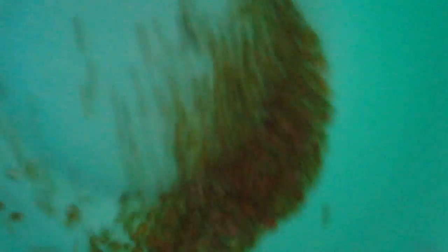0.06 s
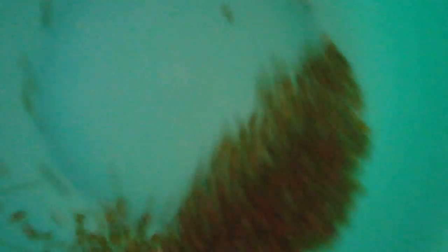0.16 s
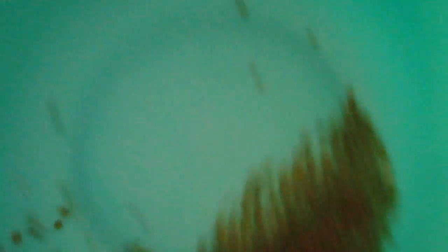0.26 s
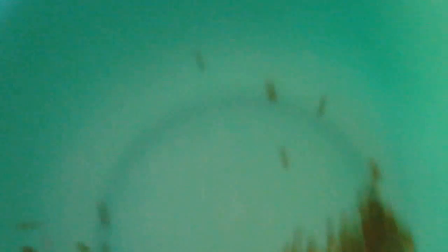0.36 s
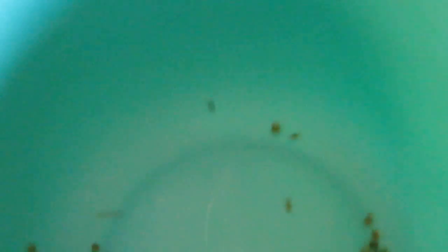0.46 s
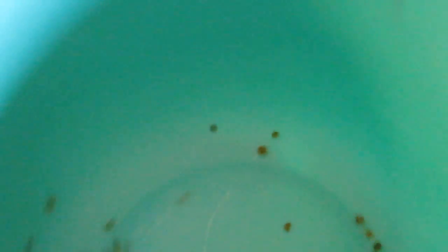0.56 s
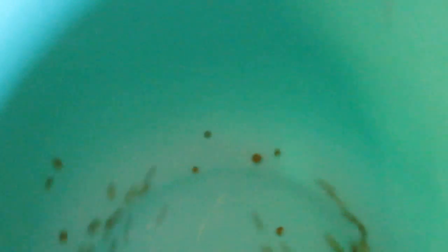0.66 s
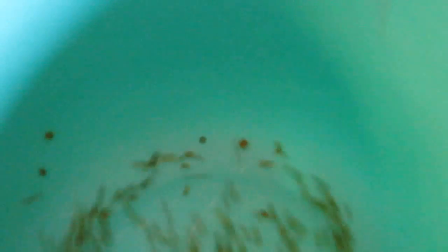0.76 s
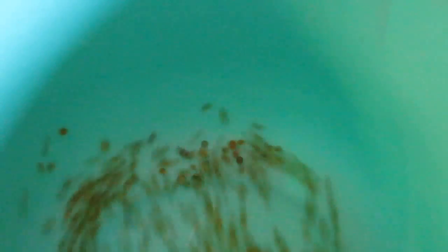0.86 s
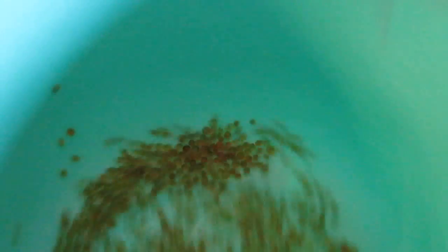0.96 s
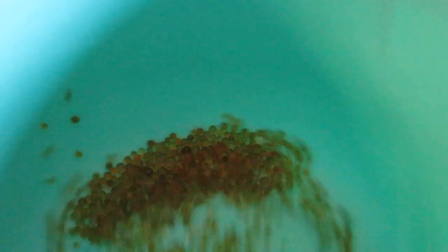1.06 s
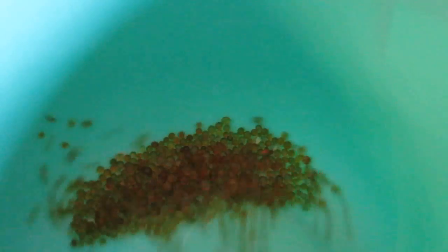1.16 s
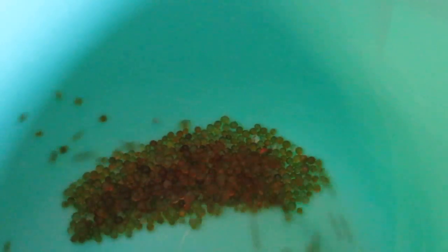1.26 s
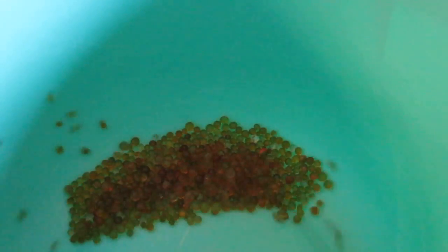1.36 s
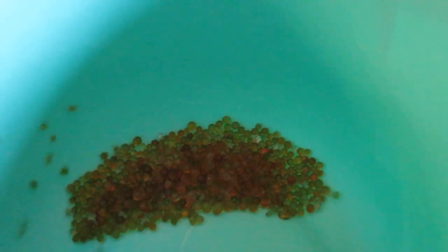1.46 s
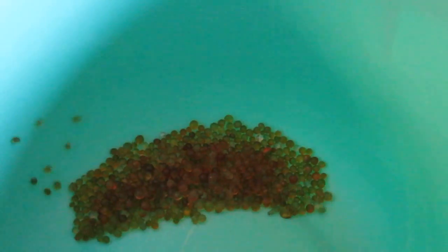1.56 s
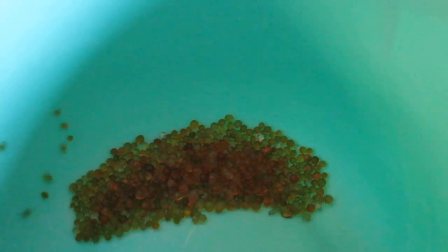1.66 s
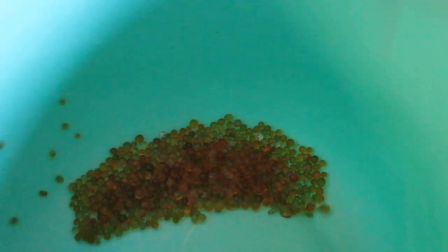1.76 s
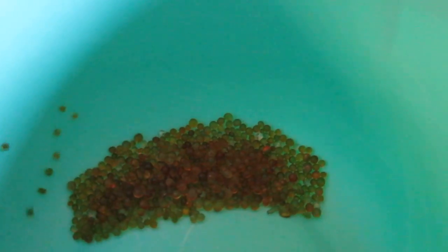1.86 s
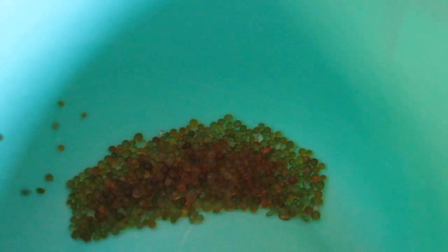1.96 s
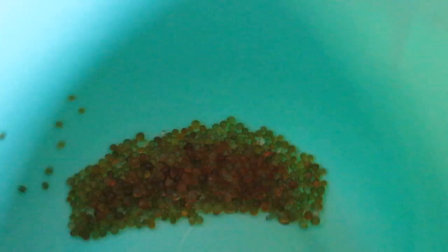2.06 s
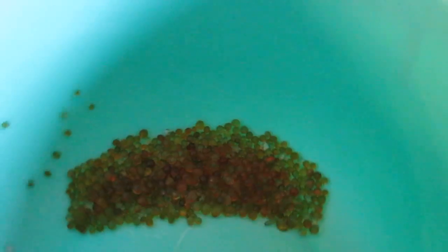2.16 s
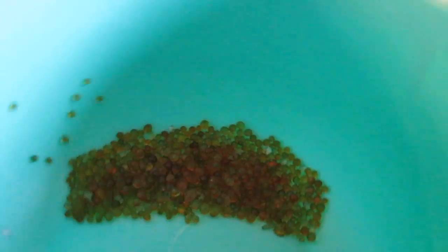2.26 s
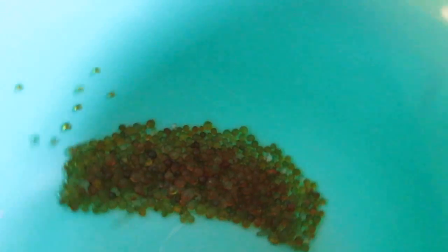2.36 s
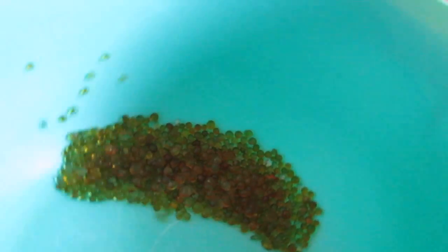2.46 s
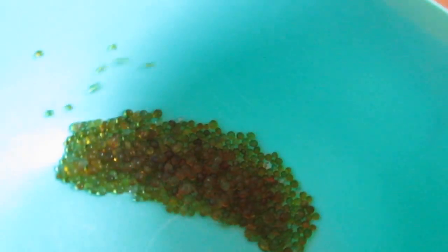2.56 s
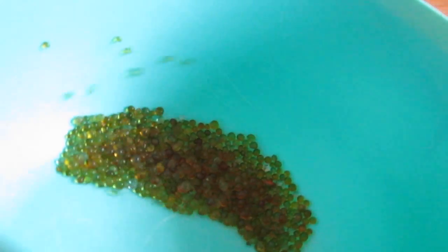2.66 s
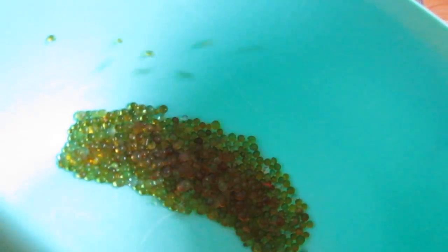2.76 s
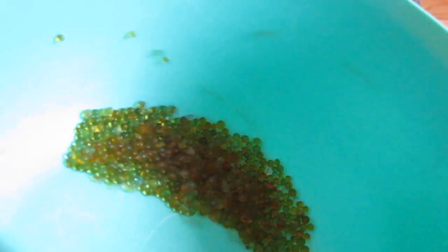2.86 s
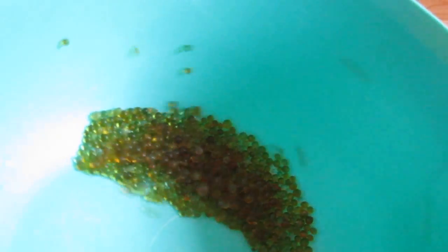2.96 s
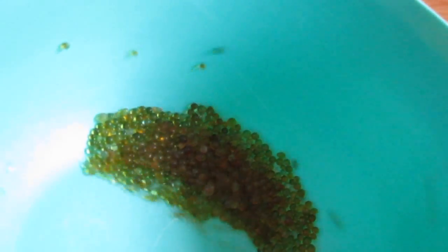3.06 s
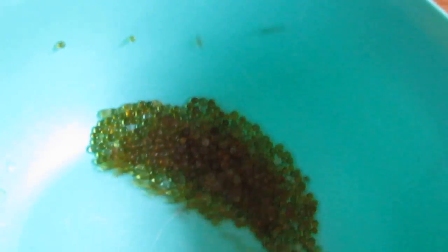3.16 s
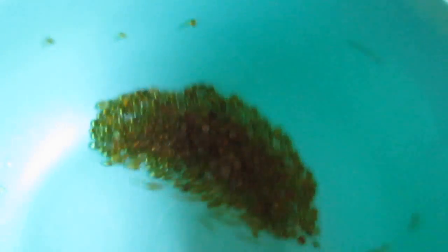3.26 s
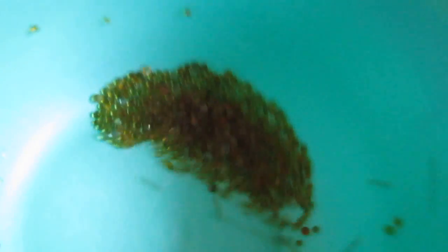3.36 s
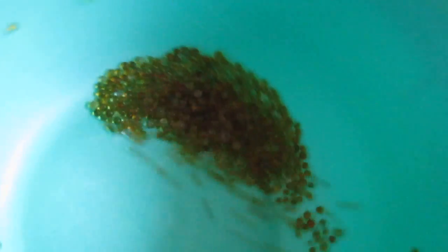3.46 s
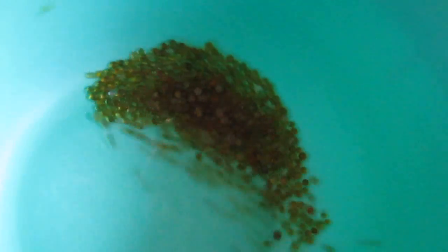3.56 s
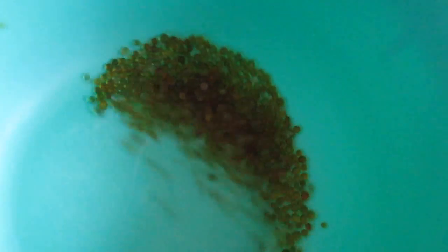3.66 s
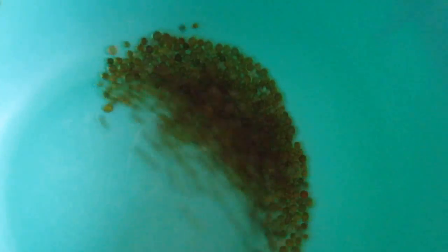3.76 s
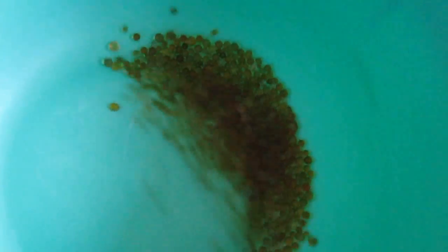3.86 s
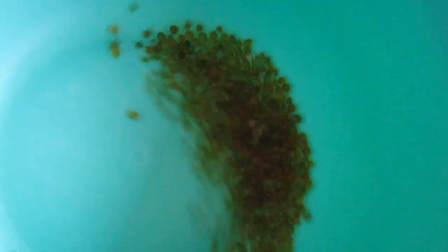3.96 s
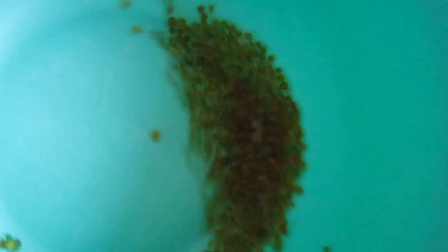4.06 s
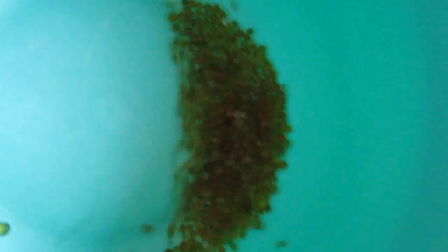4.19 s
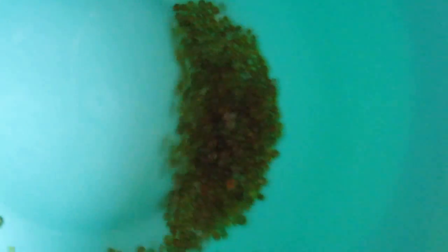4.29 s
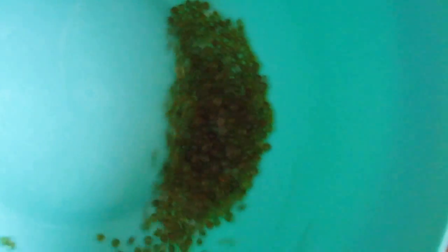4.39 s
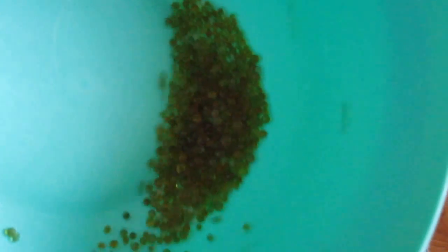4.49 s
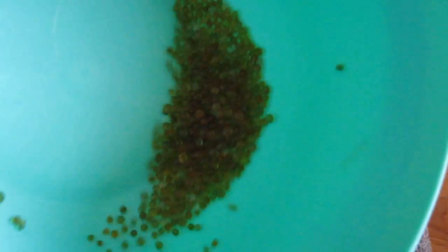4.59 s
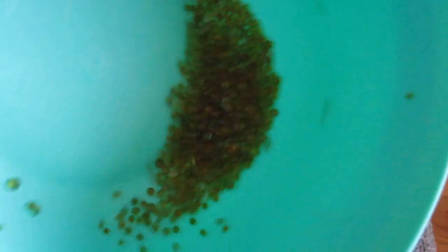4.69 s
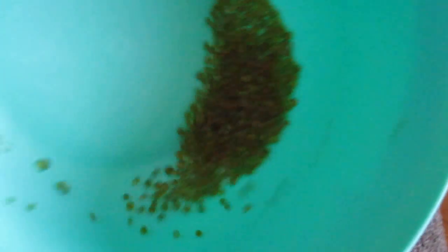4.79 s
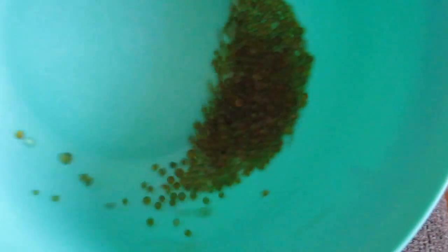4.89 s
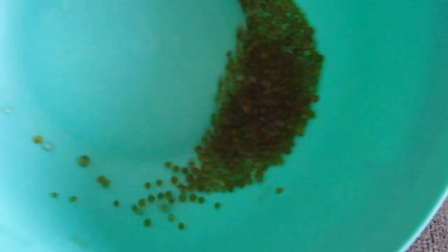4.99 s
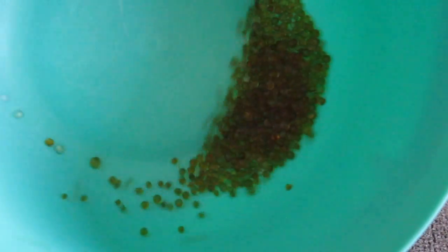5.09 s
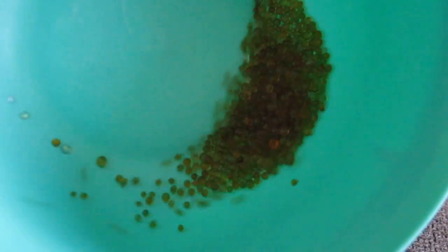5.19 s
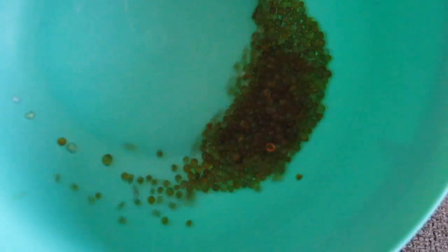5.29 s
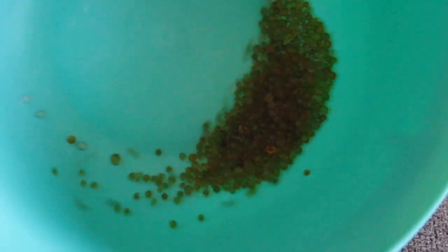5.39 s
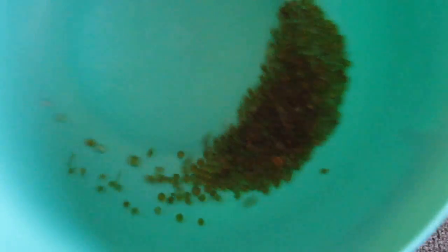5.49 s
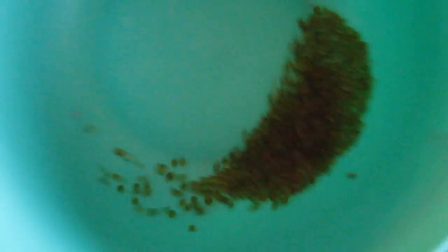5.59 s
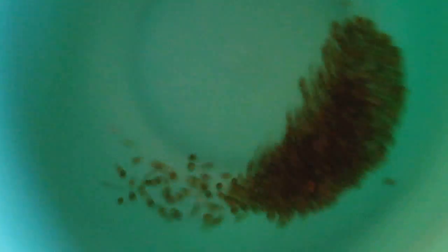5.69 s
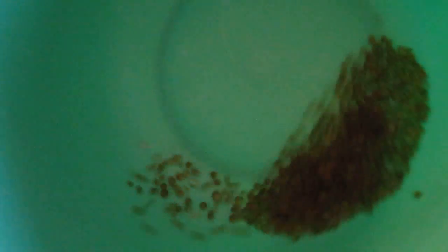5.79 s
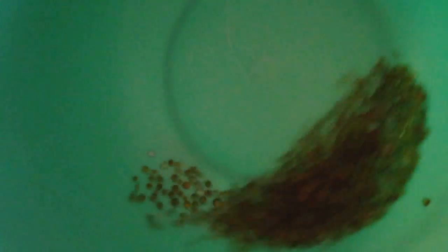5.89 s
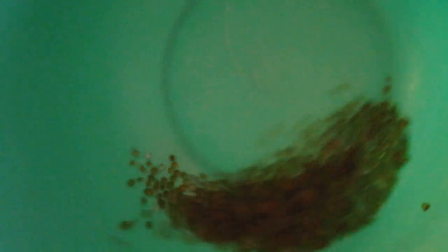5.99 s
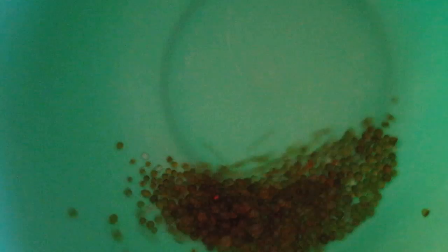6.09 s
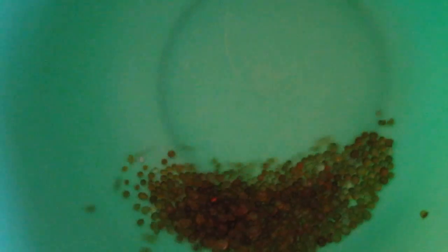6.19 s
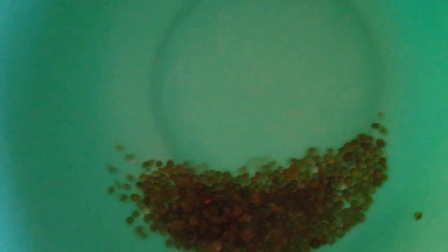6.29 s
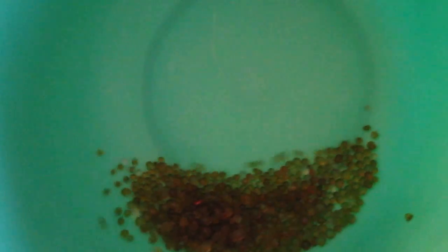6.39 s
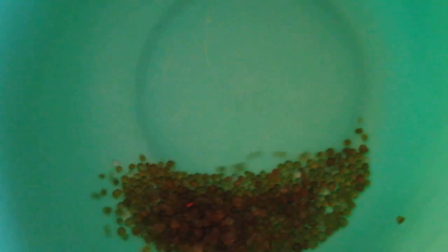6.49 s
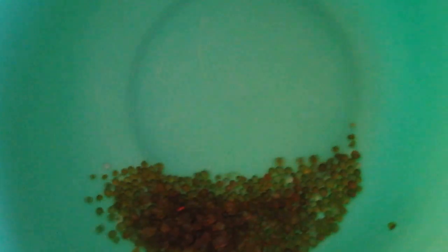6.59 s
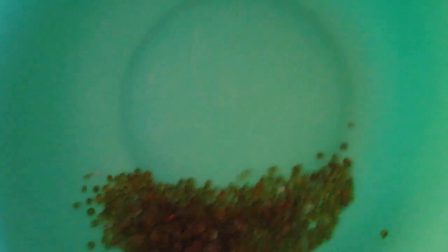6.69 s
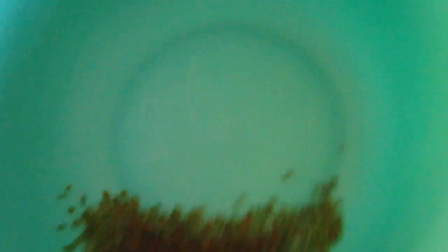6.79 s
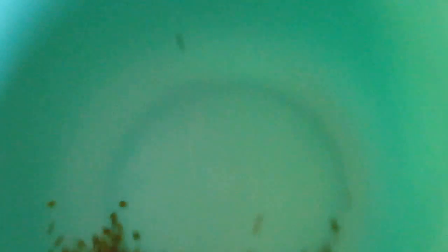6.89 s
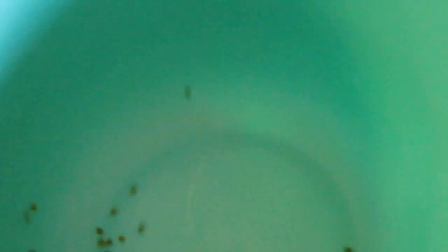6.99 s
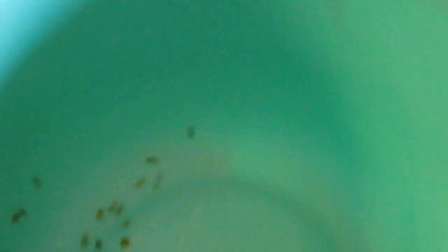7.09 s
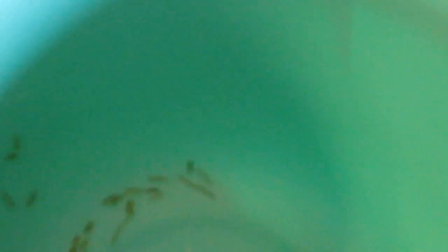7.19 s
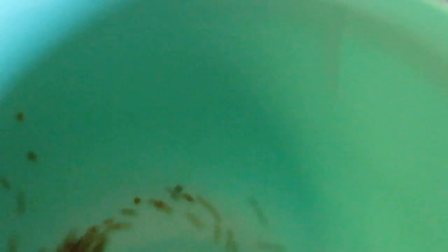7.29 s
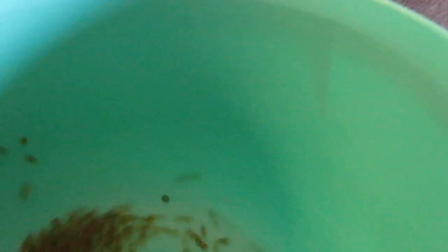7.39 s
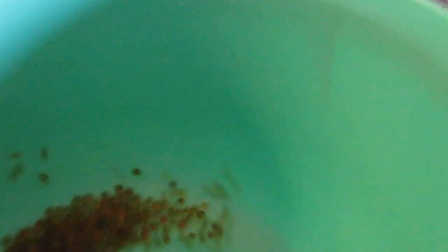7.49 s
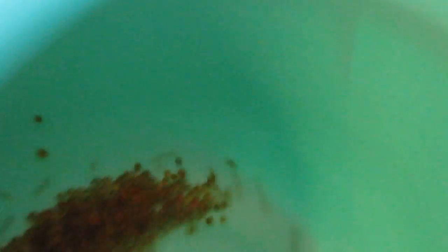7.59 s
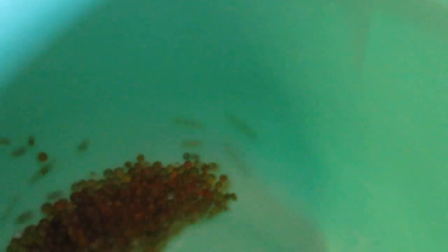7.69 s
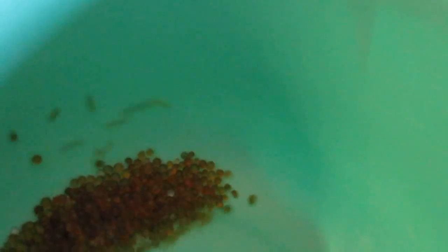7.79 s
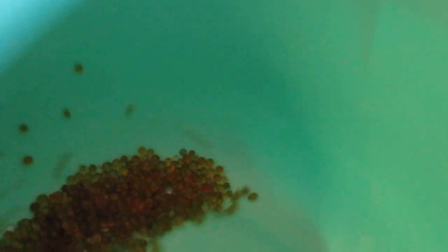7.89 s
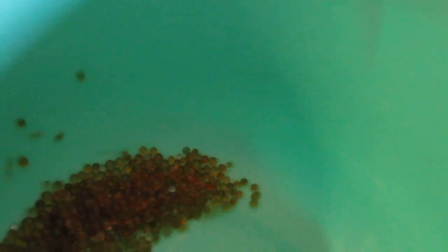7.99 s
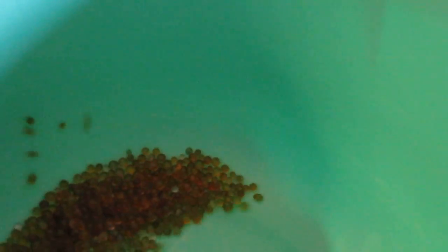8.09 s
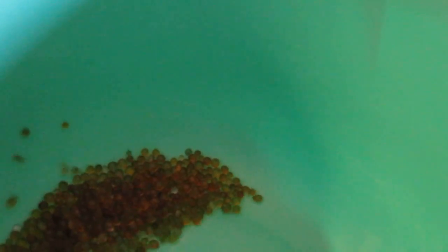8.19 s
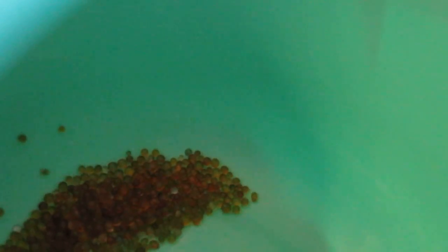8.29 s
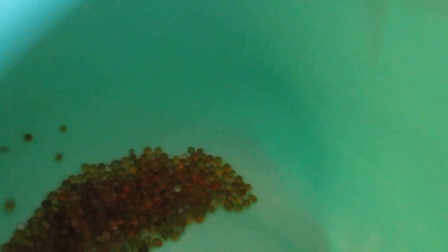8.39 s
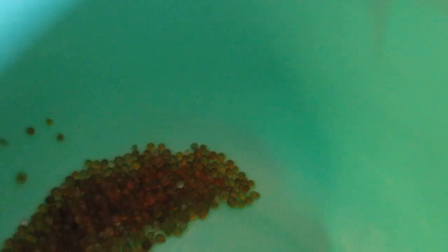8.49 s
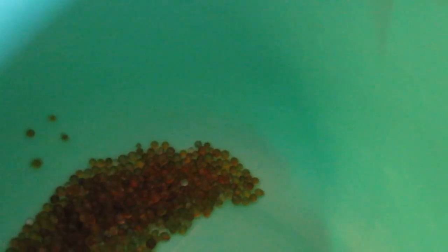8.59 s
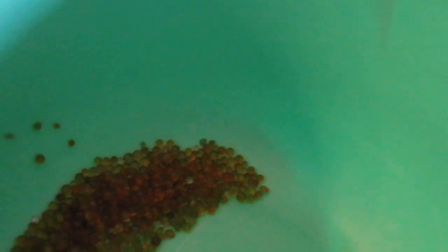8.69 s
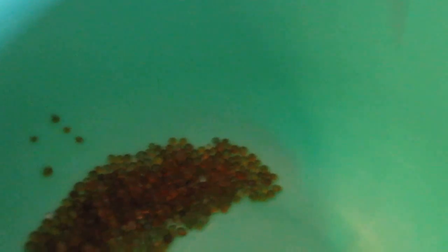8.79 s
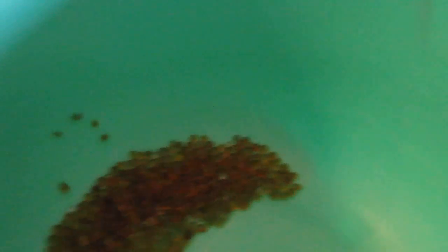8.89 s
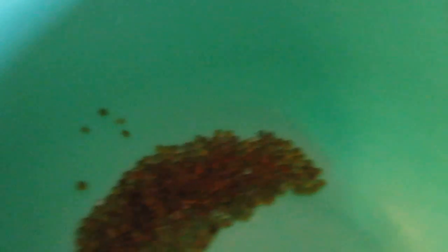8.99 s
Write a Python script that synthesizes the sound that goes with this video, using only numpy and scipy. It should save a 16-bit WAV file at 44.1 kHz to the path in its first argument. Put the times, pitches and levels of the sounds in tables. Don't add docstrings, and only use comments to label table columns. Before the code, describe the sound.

Many small hard beads pour and rattle around a plastic bowl in uneven swirls, thinning to lone ticks in short quiet pauses.

```python
import sys
import numpy as np
from scipy import signal
from scipy.fft import rfft, irfft
from scipy.io import wavfile

SR = 44100
rng = np.random.default_rng(int(sys.argv[2]) if len(sys.argv) > 2 else 0)


def int16_out(signal):
    q = np.round(np.clip(np.atleast_2d(signal).T, -1, 1) * 32767)
    wavfile.write(sys.argv[1], SR, q.astype(np.int16))


def ratio_of_db(decibels):
    return 10 ** (np.asarray(decibels, float) / 20)


N = 399105

# pitch_hz, width_hz, then level_db with the heap at the
# near wall [dB], lower side [dB], upper side [dB], far wall [dB]
WALL_MODES = [(318.5, 29.4, -16.5, -7, -19, -8.5), (421, 110, -15, -7, -20.5, -15.5),
              (651, 166, -7.5, -9.5, -12.5, -9), (1160, 107, -18.5, -9, -15.5, -4),
              (1347, 200, -19.5, -27, -12, -9.5), (1448, 217, -5, -12, -9.5, -16.5),
              (1936, 240, -12.5, -10.5, -12, -11), (2229, 132, -10.5, -11, -12.5, -11.5),
              (2523, 430, -13, -20, -12, -8.5), (2973, 110, -10.5, -11.5, -13.5, -23.5),
              (3226, 380, -10, -5.5, -11, -11), (3550, 220, -11.5, -10.5, -15, -8),
              (3830, 470, -13, -11.5, -10, -8.5), (4750, 460, -12.5, -15, -10.5, -11.5),
              (5010, 560, -6.5, -10.5, -17, -19), (5620, 310, -9.5, -6.5, -23, -15),
              (5976, 450, -8.5, -8.5, -11.5, -5), (6500, 610, -10, -28, -14, -14),
              (7560, 500, -17, -18.5, -10.5, -27), (8600, 350, -16, -13.5, -17, -12.5)]
SLOW_DB = -28.5
ECHO_S = 0.013
RING_VARIETY_DB = 3.0


def heap():
    # pitch_hz, level_db
    tick_colour = [(400, -7), (800, -22), (1700, -14), (3000, -10.5), (5000, -7.5), (7000, -11.5),
                   (9000, -3.5), (12000, -3.5), (16000, -48)]
    busy_per_s, thinning = 3500, 0.75
    echo_db = -8
    vigour, tumble, place = motion()
    creep = np.maximum(SLOW_DB - vigour, 0)
    rest = np.clip(-24 - vigour, 0, 14)

    def by_place(row):
        return np.interp(place, np.arange(4), row)

    levels = [vigour,
              vigour + by_place((-9.5, -15.5, -10, -14.5)) - 0.055 * creep + 0.8 * tumble,
              vigour + by_place((1, -4, -4.5, -11)) - 0.44 * creep + 0.3 * tumble,
              vigour + by_place((-4, -5.5, -7, -8.5)) - creep + tumble]

    per_s = np.clip(busy_per_s * ratio_of_db(thinning * (vigour + 25)), 200, 10000)
    clump_db = np.clip(-0.22 * (vigour + 14.5), 0.8, 4.0)
    train = knocks(per_s, spread_db=3.0, clump_db=clump_db)
    fade = ratio_of_db(-120 / (ECHO_S * SR))
    scatter = ratio_of_db(echo_db) * np.sqrt(signal.lfilter([1 - fade], [1, -fade], train ** 2))
    chance = rng.standard_normal(N + 5000)

    breathing_hz = by_place((543, 530, 522, 543)) - by_place((6.5, 1.24, 7.2, 2.5)) * rest
    breathing_db = levels[1] + by_place((0, 1, -7, -0.5)) + 0.4 * rest
    out = gliding(chance[:N][::-1] * ratio_of_db(breathing_db), breathing_hz, 39)

    for k, (hz, width_hz, *place_db) in enumerate(WALL_MODES):
        own = chance[k * 200:][:N]
        drive = train * (0.66 + 0.58 * own) + (0.41 + scatter) * own[::-1]
        ring = steep(drive * ratio_of_db(level_at(hz, levels) + by_place(place_db)), hz, width_hz)
        out += (-1) ** k * ring

    for k, hz in enumerate(np.geomspace(400, 16500, 16)):
        own = chance[k * 230 + 100:][:N]
        drive = (train + 0.86 * scatter + 0.087) * own
        out += resonate(drive * ratio_of_db(level_at(hz, levels) + at_hz(tick_colour, hz)), hz, 0.43 * hz)
    return out


def motion():
    # time_s, vigour_db, tumbling_db (tumbling rather than sliding)
    swirls = [
        [(0, -19.5, 5), (.33, -23, -1), (.47, -26.5, -5.5), (.68, -23.5, 0), (1.17, -24.5, 2), (1.33, -28, 1),
         (1.41, -32, -6), (1.53, -40, 2), (2.05, -51.5, -6)],
        [(2.27, -51.5, 10), (2.4, -42, 5), (2.65, -35.5, 1), (2.87, -30, -1), (3.4, -20, 0.5), (4.02, -20, 5),
         (4.4, -25, 5), (4.56, -30, 2), (4.8, -26.5, 2)],
        [(5.0, -31, 5), (5.14, -28.5, 1.5), (5.45, -30.5, 0), (5.85, -21.5, 2.5), (6.03, -19, -2),
         (6.27, -32.5, 1.5), (6.55, -41, 9), (6.7, -43, 3)],
        [(6.8, -39, -1), (6.96, -30.5, -4.5), (7.15, -19.5, -4.5), (7.3, -25, 0.5), (7.68, -24, 0.5),
         (7.96, -32.5, 0.5), (8.24, -40, -1), (8.33, -52, -5), (9.05, -52.5, -3)],
    ]
    # time_s, place [0 near wall, 1 lower side, 2 upper side, 3 far wall]
    heap_path = [(0, 2.2), (.3, 0.87), (.45, 0.8), (.65, 0.036), (1.3, 0.07), (1.6, .6), (2.5, 1.52),
                 (3.3, 1.88), (4.0, 2.58), (4.35, 3.2), (5.5, 2.8), (5.8, 1.3), (6.2, 1.32), (7.0, 0.55),
                 (7.3, 0.032), (7.8, 0.3), (8.2, 0.56), (9.05, 1.2)]
    vigour, tumble = in_time(np.vstack(swirls))
    return vigour, tumble, in_time(heap_path)[0]


def level_at(hz, levels):
    region_hz = [500, 2800, 5600, 11000]
    low, middle, upper, top = [np.interp(np.log(hz), np.log(region_hz), row) for row in np.eye(4)]
    return middle * levels[0] + low * levels[1] + upper * levels[2] + top * levels[3]


def knocks(per_s, spread_db, clump_db):
    sizes = ratio_of_db(spread_db * np.minimum(rng.exponential(1, N), 5)) * rng.choice([-1, 1], N)
    born = rng.random(N) < per_s * ratio_of_db(clump_db * drift(25)) / SR
    return rms_one(sizes) * born / np.sqrt(per_s / SR)


def strays(rows):
    delay_s = 0.0012
    ring_share = 2
    tick_echo_db, tick_variety_db, stray_db = -17, 1.8, -2
    out, age = np.zeros(N + 2000), np.arange(1500) / SR

    hz, width_hz, near_db, side_db = np.transpose(WALL_MODES)[:4]
    decay = np.exp(-np.pi * 1.1 * np.outer(width_hz, age))
    modes = np.sin(2 * np.pi * np.outer(hz, age)) * decay * np.minimum(age / 0.00041, 1)
    slope = np.minimum((hz / 3000) ** 1.25, 3500 / hz)

    luck = rng.standard_normal((len(rows), len(WALL_MODES) + 4))
    echoes = rng.standard_normal((len(rows), 1500)) * ratio_of_db(tick_echo_db - 60 * age / ECHO_S)
    echoes *= age > 0.0008
    echoes[:, 0] = 1

    for (s, peak_db, tick_hz, ring_db), own, echo in zip(rows, luck, echoes):
        cycles = tick_hz * age[:120]
        tick = 0
        for m, db, g in zip((0.7, 1.1, 1.55, 2.2), (-8.5, -2.0, -5, -9.5), own):
            swell = m * cycles * np.exp(-0.86 * m * cycles)
            tick = tick + np.sin(2 * np.pi * m * cycles) * swell * ratio_of_db(db + tick_variety_db * g)
        tick = np.convolve(tick / np.abs(tick).max(), echo)[:1500]
        strength = ratio_of_db(ring_share * ring_db + side_db + 10 + RING_VARIETY_DB * own[4:]) * slope
        i = round((s + delay_s) * SR)
        out[i:i + 1500] += ratio_of_db(peak_db + stray_db) * (tick + strength @ modes)
    return out[:N]


def loose():
    per_s, at_db, range_db = 130, -32.5, 8
    tries = 1350
    s, chance = rng.uniform(0, N / SR, tries), rng.random(tries)
    luck = rng.standard_normal((tries, 3))
    vigour, tumble, place = np.array(motion())[:, (s * SR).astype(int)]
    falls = chance * tries * SR / N < per_s * np.exp(-((vigour - at_db) / range_db) ** 2)
    above_db = np.interp(place, np.arange(4), (17.4, 10.6, 17.5, 7.3))
    peak_db = vigour + above_db + 3 * np.minimum(luck[:, 0], 1)
    tick_hz = 6400 * np.exp(0.088 * luck[:, 1])
    ring_db = -15 + RING_VARIETY_DB * np.minimum(luck[:, 2], 1)
    return np.transpose([s, peak_db, tick_hz, ring_db])[falls]


def grip():
    # start_s, length_s, level_db
    shifts = [
        (1.75, 0.82, -51.5),
        (4.036, .4, -46),
    ]
    rise_db_per_s, fall_db_per_s = 114, 120
    white, t = rng.standard_normal(N), np.arange(N) / SR
    dull = steep(white, 158.0, 14) - 2.4 * steep(white, 231, 62)
    waver = 1.5 * drift(12)
    loudness = np.zeros(N)
    for s, length, db in shifts:
        before = rise_db_per_s * np.maximum(s - t, 0)
        after = fall_db_per_s * np.maximum(t - s - length, 0)
        loudness += ratio_of_db(db + waver - before - after)
    return rms_one(dull) * loudness


def room():
    # pitch_hz, level_db (per Hz)
    room_colour = [(15, -22), (25, 0.5), (45, -3.5), (130, -5), (400, -6.5), (650, -10), (900, -4.5),
                   (1450, -10), (2600, -10.5), (4000, -23), (7000, -20), (10000, -24), (14000, -32),
                   (17500, -38)]
    # pitch_hz, width_hz, level_db
    room_peaks = [(38.6, 16, -22), (1098, 81, -9), (1266, 47, -14), (1616, 69, -17.5), (1950, 110, -20),
                  (2300, 160, -23), (2890, 85, -30.5), (4800, 790, -22), (15700, 30, -40)]
    room_db, duck, waver_db = -43.5, 0.16, 0.9
    hz = np.maximum(np.arange(N // 2 + 1) * SR / N, 1)
    noise = rms_one(irfft(rfft(rng.standard_normal(N)) * ratio_of_db(at_hz(room_colour, hz)), N))
    white = rng.standard_normal(N)
    noise = 0.74 * noise + sum(ratio_of_db(db) * steep(white, f, w) for f, w, db in room_peaks)
    loud = np.maximum(motion()[0] - SLOW_DB, 0)
    return noise * ratio_of_db(room_db - duck * loud + waver_db * drift(3.2))


def rms_one(x):
    return x / np.sqrt(np.mean(x ** 2) + 1e-20)


def in_time(rows):
    s, *columns = np.transpose(rows)
    return [np.interp(np.arange(N) / SR, s, c) for c in columns]


def at_hz(points, hz):
    point_hz, db = np.transpose(points)
    return np.interp(np.log(hz), np.log(point_hz), db)


def drift(rate):
    steps = rng.standard_normal(int(N / SR * rate) + 2)
    return np.interp(np.arange(N) / SR * rate, np.arange(len(steps)), steps)


def resonate(x, hz, width_hz):
    r = np.exp(-np.pi * width_hz / SR)
    gain = np.sqrt((1 - r * r) / 2)
    return signal.lfilter([gain, 0, -gain], [1, -2 * r * np.cos(2 * np.pi * hz / SR), r * r], x + 1e-18)


def steep(x, hz, width_hz):
    wide = 1.4 * width_hz
    top = np.sqrt(SR / (2 * np.pi * wide)) / np.sqrt(2)
    return resonate(resonate(x, hz, wide), hz, wide) / top


def gliding(x, hz, width_hz):
    turn = np.exp(2j * np.pi * np.cumsum(hz) / SR)
    r = np.exp(-np.pi * width_hz / SR)
    return np.real(turn * signal.lfilter([np.sqrt(2 - 2 * r * r)], [1, -r], x / turn))


def scene():
    # start_s, peak_db, tick_hz, ring_db (wall
    lone_beads = [(1.371, 0, 5780, -12), (1.3934, -4, 6600, -17), (1.4202, -14, 6420, -17),
                  (1.4359, -7, 5700, -15), (1.4775, -8, 6370, -20), (1.493, -19, 6500, -17),
                  (1.514, -12, 6500, -21), (1.5234, -14, 6360, -10), (1.5564, -15, 6400, -15),
                  (1.728, -20, 6480, -8), (1.7364, -18, 5870, -8), (1.7524, -21, 5790, -14),
                  (2.3491, -16.5, 5800, -9), (2.395, -19, 5190, -14), (2.4014, -17, 6310, -9),
                  (2.4204, -16, 6400, -8.5), (2.5571, -19, 4530, -19), (2.5832, -18, 4980, -2.5),
                  (2.6085, -16, 7320, -15), (2.6249, -11, 5160, -13), (2.663, -8, 6400, -15.5),
                  (2.6908, -2, 6900, -21), (2.7054, -20, 6630, -17), (2.7477, -4, 6900, -27),
                  (2.7523, -13.5, 7380, -14), (2.7756, -15.5, 4550, -14), (2.814, -12, 7250, -15),
                  (2.949, -12.5, 5000, -13), (2.9873, -6, 6540, -17.5), (3.1438, -3, 4530, -23),
                  (6.328, -28, 4960, -10), (6.459, -13, 5870, -3), (6.4654, -35, 5820, -5),
                    (6.4996, -11, 4900, -9), (6.564, -27, 5640, 1), (6.5964, -23, 7750, 0),
                    (6.6084, -30, 5030, -3), (6.6378, -27, 4820, -5), (6.7501, -14, 5400, -18),
                    (6.9125, -9.5, 5860, -19), (6.976, -7, 5230, -13), (7.859, -7, 6320, -17),
                    (7.8834, -20.5, 5150, -9.5), (7.9663, -8, 5130, -17), (8.0192, -9, 5140, -16),
                    (8.0316, -5, 4900, -14.5), (8.0508, -9, 6000, -14), (8.0985, -14, 5100, -18),
                    (8.1334, -21, 5850, -16), (8.1574, -14, 5200, -16), (8.1905, -2, 5040, -26),
                    (8.205, -8, 5850, -18), (8.2114, -19, 5840, -14), (8.2621, -22, 4940, -14),
                    (8.2684, -27, 5160, -15), (8.278, -20, 5690, -19), (8.2884, -34, 5880, -15),
                    (8.305, -24, 4710, -16), (8.8258, -29, 8790, -10), (8.8832, -26, 5900, -2.5)]
    beads = heap() + strays(lone_beads) + strays(loose())
    no_bass = signal.butter(6, 265, "high", fs=SR, output="sos")
    return (signal.sosfilt(no_bass, beads) + grip() + room())[None]


def top_cut(x):
    return signal.sosfilt(signal.butter(12, 18490, fs=SR, output="sos"), x)


def record(dry):
    soft_cut = signal.cheby2(10, 33, 17750, fs=SR, output="sos")
    hard_cut = signal.cheby2(12, 50, 18500, fs=SR, output="sos")
    rounded = 1.094 * np.tanh(signal.sosfilt(soft_cut, dry) / 1.215)
    mix = signal.sosfilt(hard_cut, rounded)
    return top_cut(mix)


dry = scene()
out = record(dry)
int16_out(out)
```